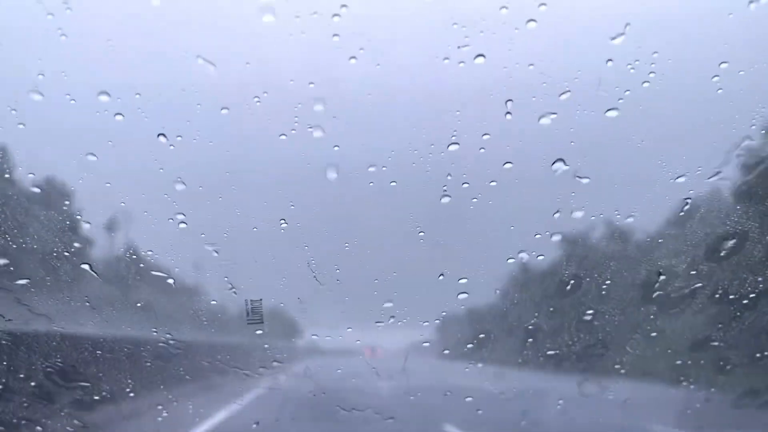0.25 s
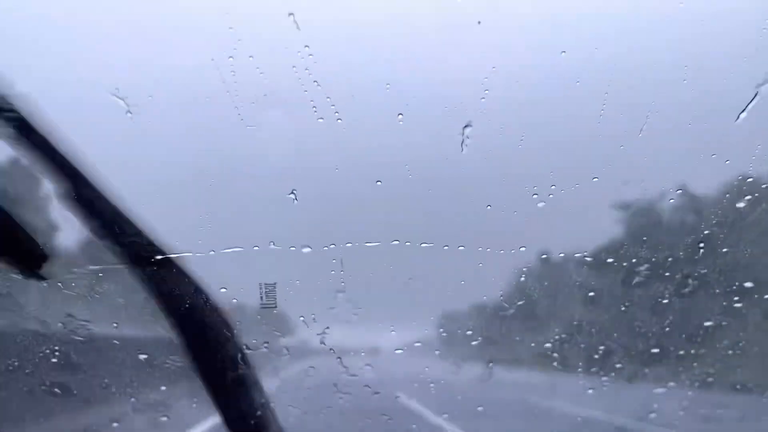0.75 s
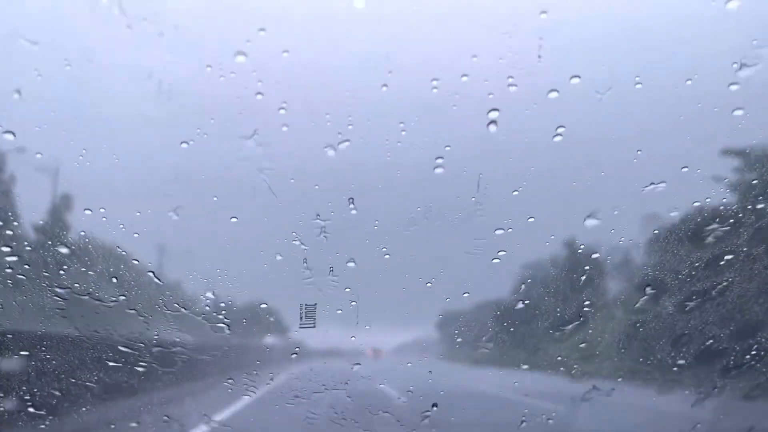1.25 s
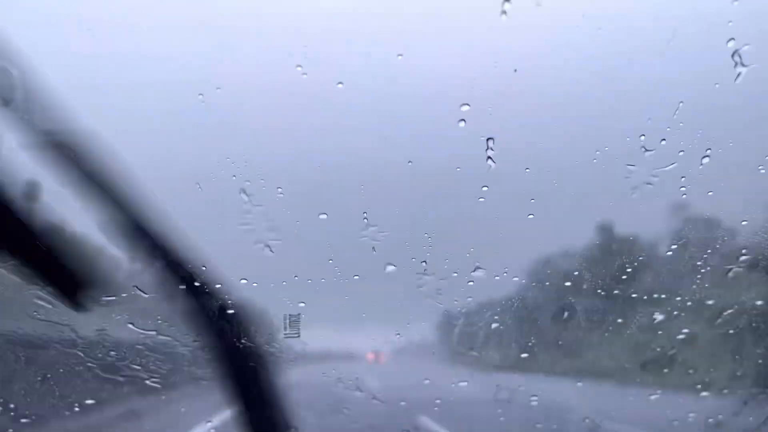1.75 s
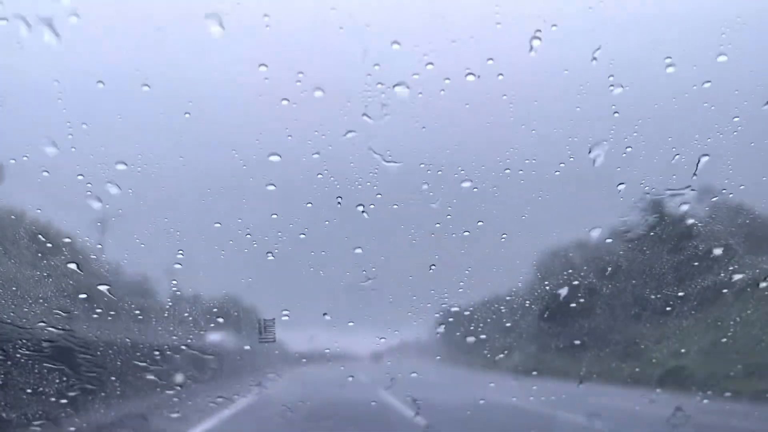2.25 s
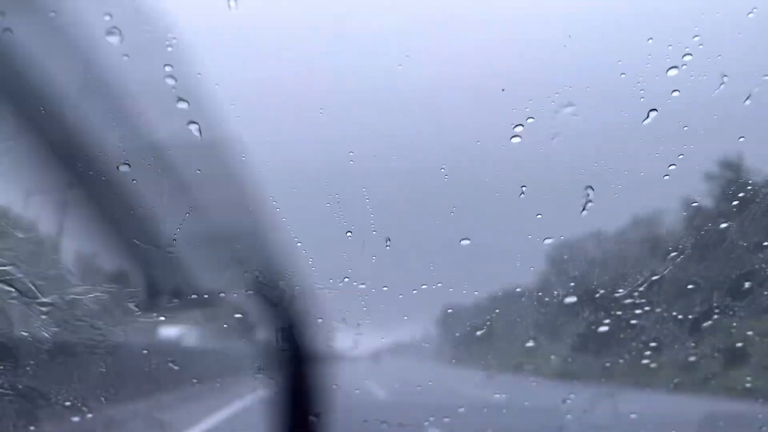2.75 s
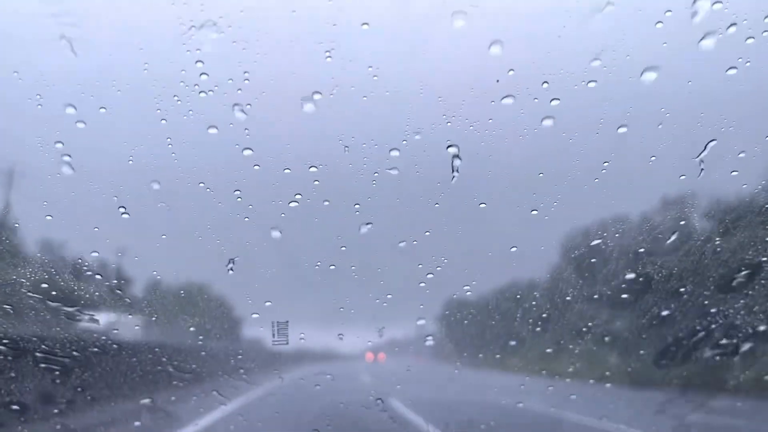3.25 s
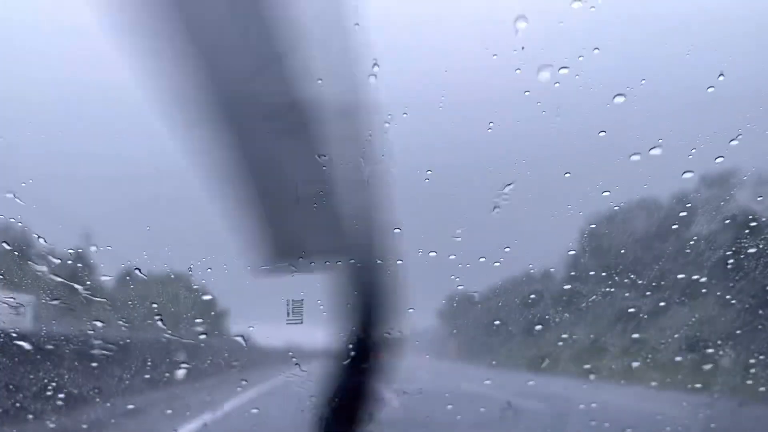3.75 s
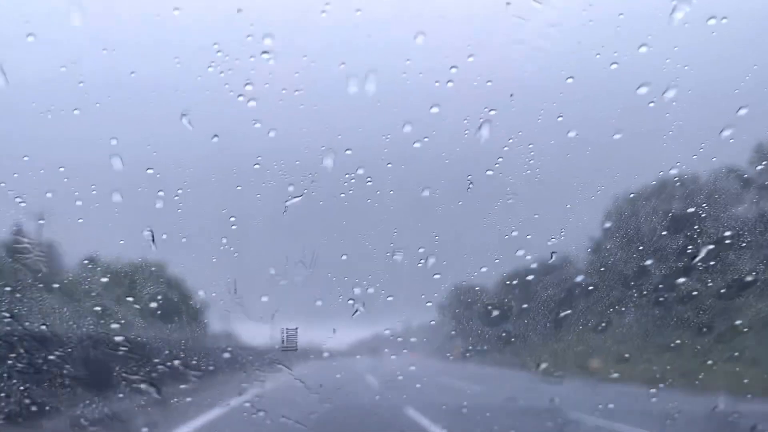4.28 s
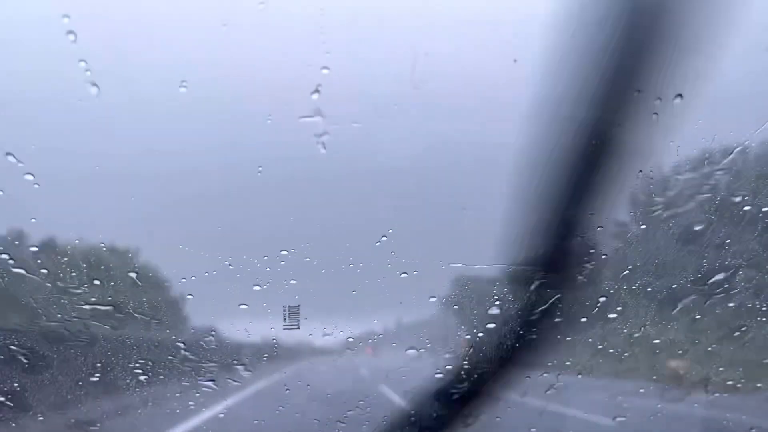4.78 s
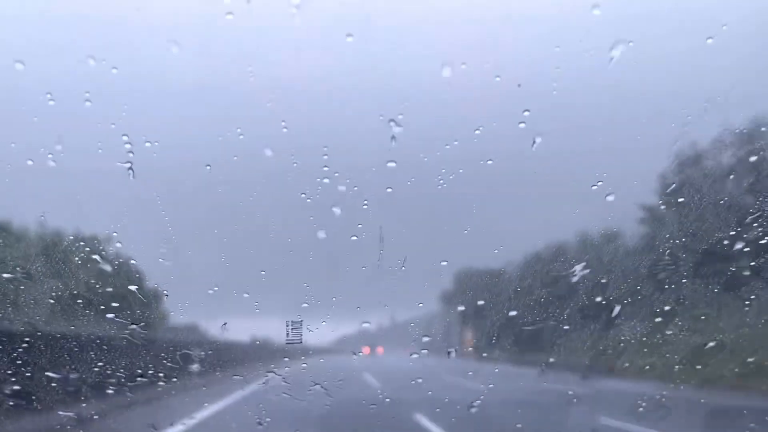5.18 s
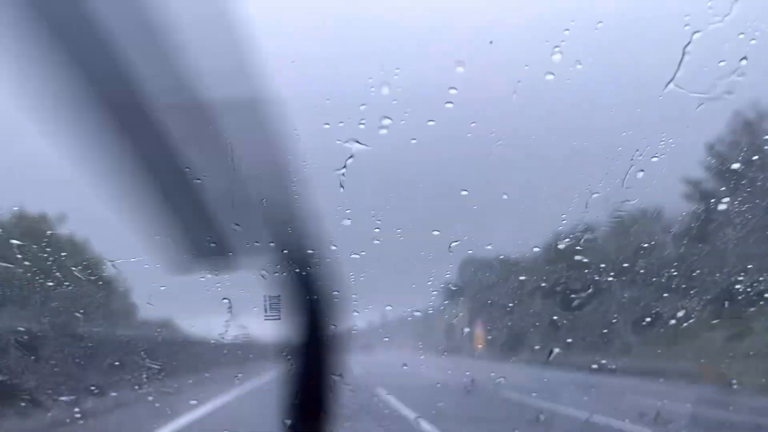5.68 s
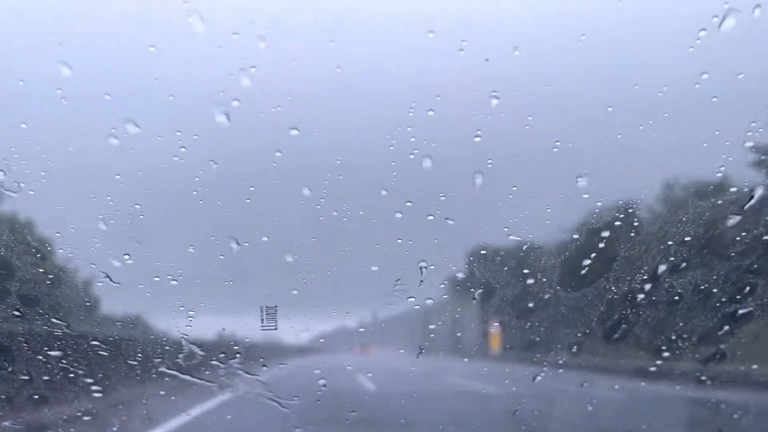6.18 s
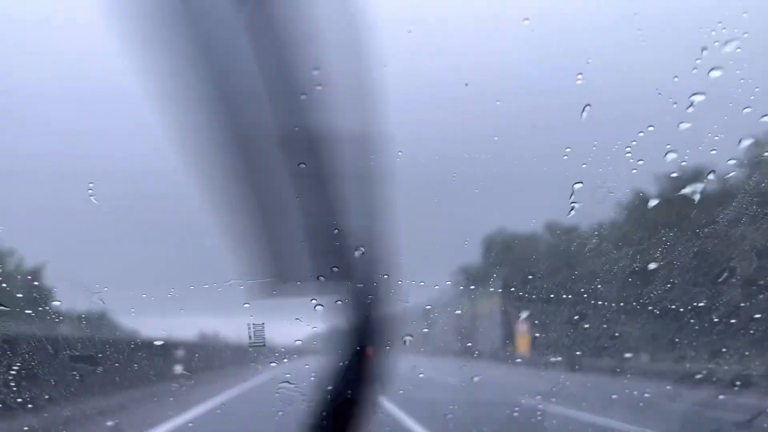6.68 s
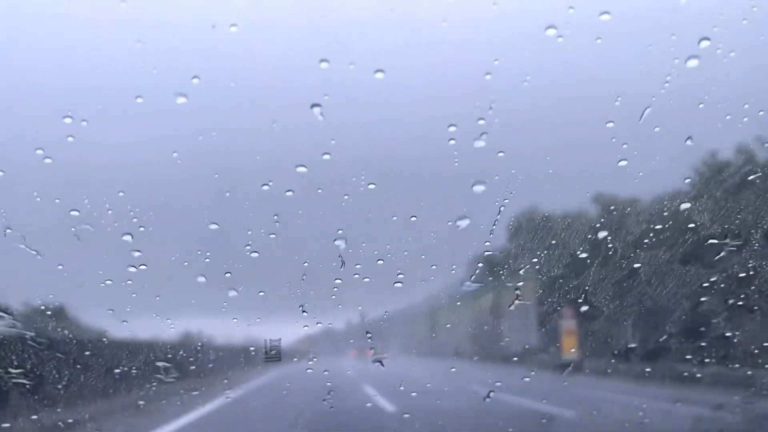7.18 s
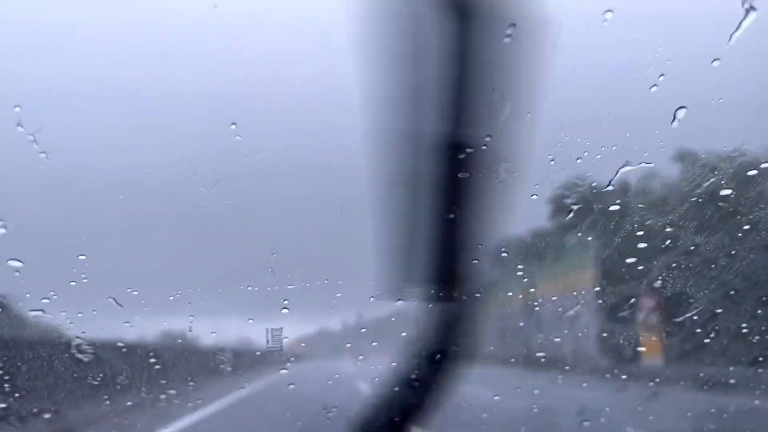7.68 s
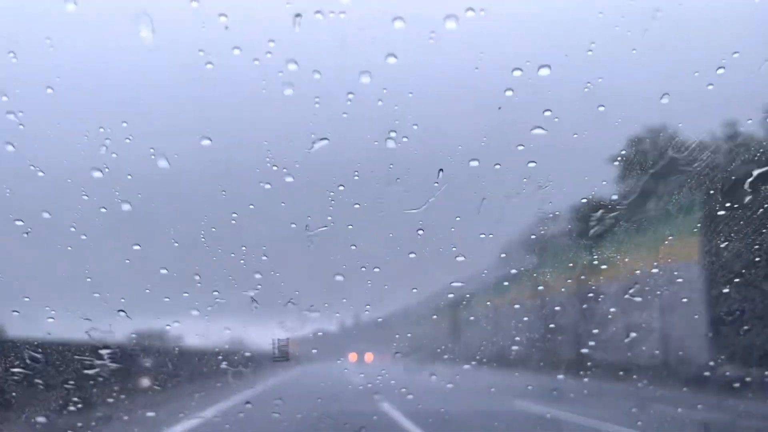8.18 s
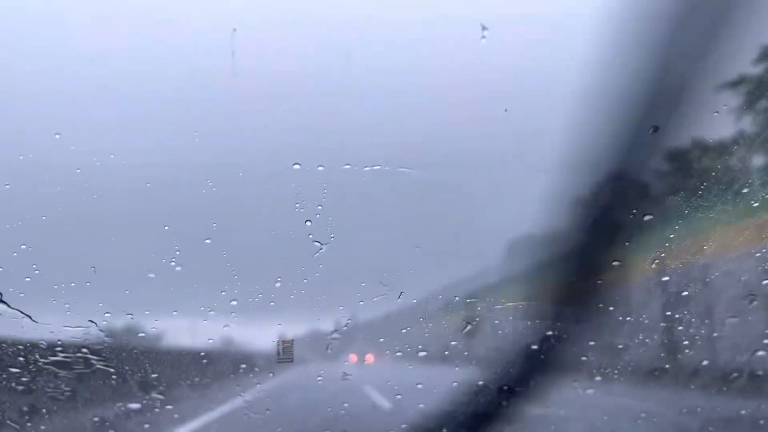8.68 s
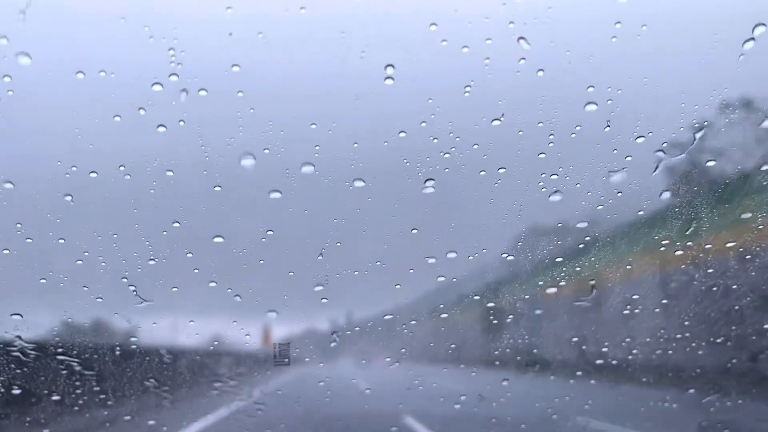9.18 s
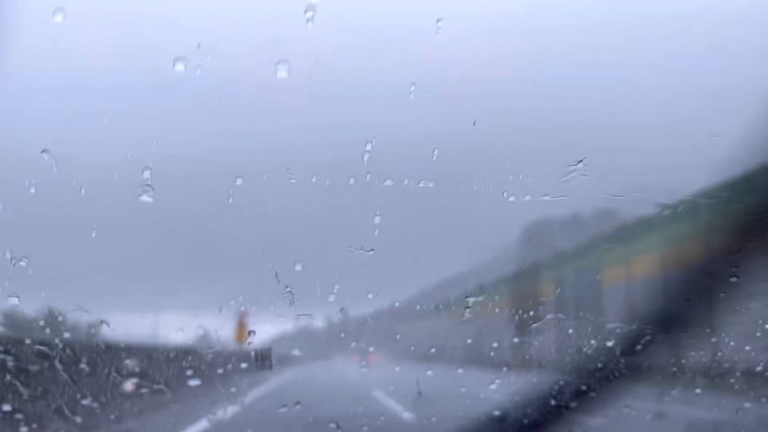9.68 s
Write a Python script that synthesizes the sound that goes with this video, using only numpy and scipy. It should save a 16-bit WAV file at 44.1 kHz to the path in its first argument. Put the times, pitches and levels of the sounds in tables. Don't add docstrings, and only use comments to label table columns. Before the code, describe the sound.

Inside a car in heavy rain, a crackling wash of drops surges and thins above a deep cabin boom, punctuated by regular soft wiper thuds.

```python
import sys
import numpy as np
from scipy import signal
from scipy.fft import rfft, irfft, dct, next_fast_len
from scipy.io import wavfile
from scipy.ndimage import uniform_filter1d

SR = 44100
rng = np.random.default_rng(int(sys.argv[2]) if len(sys.argv) > 2 else 0)


def to_wav(s):
    ch = np.atleast_2d(s).T
    pcm = np.round(np.clip(ch, -1, 1) * 32767)
    wavfile.write(sys.argv[1], SR, pcm.astype(np.int16))


def linear_from_db(decibels):
    return 10 ** (np.asarray(decibels, float) / 20)


N = 438354
SIZE = next_fast_len(N)
HZ = np.arange(SIZE // 2 + 1) * SR / SIZE + 1e-3
T = np.arange(N) / SR


def rain(glass_db, roof_db, spray_db):
    # time in seconds, peak in dB, treble against the peak in dB.
    fat_drops = [(0.6584, -17, -14), (0.945, -21, -15), (1.9046, -21, -9), (1.952, -29, -2),
                 (2.596, -22, -23), (2.6863, -16, -10), (3.0115, -25, -16), (3.5565, -22, 2),
                 (3.6003, -17, 1), (3.7843, -21, -15), (3.9544, -18, -10), (4.006, -15, -29),
                 (4.2133, -18, -5), (4.3755, -19, 6), (4.5516, -14.5, -5), (5.3836, -12.5, -5),
                 (5.7083, -9, -14), (6.2065, -22, -2), (6.236, -14, -2), (6.314, -18, -15),
                 (6.4938, -11, -8), (6.537, -13, -3), (6.5777, -11.5, -10), (6.785, -18.5, -1),
                 (6.992, -16.5, -11.5), (7.2185, -16, -3), (7.4566, -17, -11), (7.659, -17, -3),
                 (8.7261, -22, -4), (9.8014, -19, -17)]
    # time in seconds, peak in dB.
    ticks = [(1.9869, -23), (3.5169, -16.5), (4.3216, -50), (4.345, -22), (4.4697, -16), (4.647, -17.5),
             (4.6942, -19), (5.1174, -17), (5.1866, -16.5), (5.7089, -28), (6.0452, -15), (6.0721, -17),
             (6.205, -24), (6.5814, -22), (6.7322, -21), (6.783, -21), (6.8383, -22), (6.886, -24),
             (7.013, -28), (7.1023, -24), (7.427, -21), (8.1778, -32), (8.7261, -25)]
    # frequency in Hz, density in dB per Hz.
    glass_tone = [(90, -5.5), (200, 5.5), (400, 5), (650, 1), (950, -1), (1300, -3), (1900, -4),
                  (2800, 0.5), (4000, -1), (5500, -6), (8300, -11), (11000, -13.5), (14000, -15),
                  (16000, -19.5)]
    drops_per_s = 900
    at = rng.uniform(0, N / SR, drops_per_s * N // SR)
    size_db = np.minimum(2.9 * rng.exponential(size=len(at)), 13.5)
    fat_s, fat_db, bright_db = np.transpose(fat_drops)
    tick_s, tick_db = np.transpose(ticks)

    centres = 354 * 2 ** np.arange(0, 5.6, .5)
    sheet, out = walk(22), 0
    for hz in centres:
        high = np.clip(np.log2(hz / 3500) / 2.0, 0, 1)
        low = np.clip(np.log2(2000 / hz) / 1.17, 0, 1)
        decay_s = 0.0012 + 1.0 / hz
        favour_db = 2.9 * rng.standard_normal(len(at))
        drops = tails(at, linear_from_db(2 * (size_db + favour_db)), decay_s)
        mist = np.clip(0.43 + 0.027 * (glass_db + 29.0), 0, 1)
        power = mist + (1 - mist) * drops / drops.mean()
        db = glass_db + low * roof_db + high * spray_db
        db = db + (.7 - .5 * low) * sheet + 0.78 * walk(12)

        fat_band_db = fat_db - 6.0 + high * (bright_db + 4.5) - 7.8 * low
        tick_band_db = tick_db + 5.5 - 9 * (1.5 - high) - 6.2 * low
        single = tails(fat_s, linear_from_db(2 * fat_band_db), 1.77 * decay_s)
        single += tails(tick_s, linear_from_db(2 * tick_band_db), 1.3 * decay_s)

        octaves = np.log2(np.maximum(HZ, 354) / hz)
        band = np.clip(1 - np.abs(2 * octaves), 0, 1) ** .5
        hiss = rng.standard_normal((2, N)) * np.sqrt(power * linear_from_db(2 * db) + single)
        out = out + band * rfft(hiss, SIZE)
    out = out + rfft(pings(glass_db - 10.0, ring_s=.0035), SIZE)
    return out * colour(glass_tone, 1490, 5370) * linear_from_db(1.5)


def tails(at, power, decay_s):
    hits = np.bincount((at * SR).astype(int), power, N)[:N]
    fast, slow = np.exp(-4 / (decay_s * SR)), np.exp(-1 / (decay_s * SR))
    decaying = signal.lfilter([1.], [1, -slow], hits)
    return signal.lfilter([1 - fast], [1, -fast], decaying)


def pings(level_db, ring_s):
    at, pitch, size = rng.random((3, 2, 4000, 1))
    n = np.arange(512)
    start = (at * (N - len(n))).astype(int)
    hz = 700 * 20 ** pitch ** .7
    tone = np.sin(2 * np.pi * hz * n / SR)
    rings = linear_from_db(level_db[start] + 7 * size) * tone * np.exp(-n / (ring_s * SR))
    return np.array([np.bincount((i + n).ravel(), ring.ravel(), N) for i, ring in zip(start, rings)])


def wipers():
    # time in seconds, peak in dB, pitch in Hz, knock against the peak in dB.
    flips = [
        (0.824, -17, 147, -5),
        (1.792, -14.5, 162, -9),
        (2.764, -16.5, 214, -10),
        (3.739, -17, 230, -8),
        (4.719, -12, 146, -8),
        (5.693, -11.5, 144, -8),
        (6.662, -14.5, 170, -6),
        (7.644, -14.5, 160, -3),
        (8.61, -11.5, 151, -6.5),
        (9.583, -12, 156, -1.5),
    ]
    out, t = np.zeros(N), np.arange(SR // 8) / SR

    def shape(rise_s, decay_s):
        return (1 - np.exp(-t / rise_s)) * np.exp(-t / decay_s)

    for s, db, hz, knock_db in flips:
        cycles = hz * (t + 0.58 * 0.0058 * (1 - np.exp(-t / 0.0047)))
        thud = linear_from_db(6.5) * np.sin(2 * np.pi * cycles) * shape(0.0033, 0.015)
        knock = linear_from_db(knock_db + 10.5) * np.sin(2 * np.pi * 410 * t) * shape(0.0031, 0.0051)
        i = int((s - .003) * SR)
        out[i:i + len(t)] += linear_from_db(db) * (thud + knock)[:N - i]
    return np.array([out * linear_from_db(-3.5), np.roll(out, -8) * linear_from_db(-1.8)])


def road(boom_db):
    # frequency in Hz, density in dB per Hz.
    road_tone = [(12, -20), (20, -8), (48, 2.5), (97, 3.5), (125, 1.5), (188, -13), (260, -14), (340, -27),
                 (570, -120)]
    rumble = rng.standard_normal((2, N)) * linear_from_db(boom_db)
    return rfft(rumble, SIZE) * colour(road_tone, 30, 156) * linear_from_db(-0.73)


def colour(points, lo_hz, hi_hz):
    hz, db = np.transpose(points)
    gain = linear_from_db(np.interp(np.log(HZ), np.log(hz), db))
    inside = (HZ > lo_hz) & (HZ < hi_hz)
    return gain / np.sqrt(np.sum(gain[inside] ** 2) / len(HZ))


def modes(table):
    return linear_from_db(sum(db / (1 + (2 * (HZ - hz) / width) ** 2) for hz, width, db in table))


def walk(rate):
    k = int(SR / rate)
    held = np.repeat(rng.standard_normal(400), k)[:N]
    return 1.3 * uniform_filter1d(uniform_filter1d(held, k), k)


def swells(events):
    t = T[::64]
    total_db = sum(db * np.exp(-.5 * ((t - s) / half_s) ** 2) for s, db, half_s in events)
    return np.interp(T, t, total_db)


def scene():
    # time in seconds, rain on the glass in dB.
    rainfall = [
        (0, -32),
        (1.5, -26),
        (2.8, -29.5),
        (4, -29),
        (5.6, -27),
        (6.5, -30),
        (7, -33.5),
        (7.9, -34.5),
        (9, -31.5),
        (9.94, -30.5),
    ]
    # middle in seconds, swell in dB, half length in seconds.
    gusts = [(0, 4.5, 0.056), (.38, 3.5, 0.14), (.81, 3.5, 0.02), (1.07, -3, .08), (1.26, 3.5, 0.021),
             (1.59, -3, 0.094), (1.92, -1.9, 0.019), (2.03, 4.2, 0.015), (2.52, -1.4, 0.055),
             (2.94, -4.5, 0.027), (3.32, 3, 0.067), (3.61, 1.5, 0.026), (3.71, -3.5, .035),
             (3.83, 1.5, 0.053), (4.25, -4, 0.051), (4.38, 2, 0.018), (4.67, -4, 0.038), (4.77, 3.5, 0.036),
             (5.17, -2.3, .025), (5.57, 2.3, 0.017), (6.36, 2.5, .04), (6.56, 1, 0.031), (6.73, -4.5, 0.02),
             (7.17, 4, 0.038), (7.29, -1, 0.018), (7.39, 4.5, 0.4), (7.88, 0, 0.049), (8.58, 1.5, 0.18),
             (9.6, 2.4, 0.078)]
    # middle in seconds, swell in dB, half length in seconds.
    drumming = [(.02, 3, .04), (.2, 2.5, 0.067), (.48, 0.5, .025), (1.14, -1.5, .2), (1.43, 3, .03),
                (1.65, -2, 0.06), (2.24, -4, 0.025), (3.38, -2.2, 0.13), (4.05, 2, 0.056), (5.13, -1, 0.13),
                (5.51, -4, 0.034), (6.13, 2, .04), (6.56, 3.5, 0.081), (6.75, -2.1, 0.022),
                (9.08, -1.6, 0.055), (9.18, 4, 0.023), (9.3, 1.5, .025)]
    # middle in seconds, swell in dB, half length in seconds.
    boom_swells = [(.06, 1, 0.027), (.3, 2.1, 0.055), (.53, 7, 0.019), (.68, 6, 0.12), (1.15, -3, 0.046),
                   (1.5, -0.5, 0.18), (1.85, -1, .025), (2.17, 5, 0.012), (2.43, 2, 0.063), (2.85, 2.4, .035),
                   (3.31, 3.3, .09), (3.85, 3, 0.091), (4.2, 1.5, 0.056), (4.57, 2, .025), (4.95, 0, .025),
                   (5.1, 2.5, 0.033), (5.82, -2.3, 0.064), (6.05, 2, .04), (6.88, 2.5, 0.02), (7.16, 3.5, 0.033),
                   (8.12, 3.5, 0.035), (8.27, 0, 0.046), (8.55, 2.5, .025), (8.64, 3.5, 0.07), (8.86, 3.5, .03),
                   (9.8, 1.5, 0.034)]
    # frequency in Hz, width in Hz, gain in dB.
    cabin = [(85, 20, 2), (128.7, 17, 2.5), (594, 30, 6.5), (935, 39, 6.5)]
    # frequency in Hz, width in Hz, gain in dB.
    dash = [(683, 35, 9), (1100, 18, 0.5), (1160, 17, 6)]
    # frequency in Hz, right lag in radians, likeness from 0 to 1, left minus right in dB.
    ports = [(50, 0, 1, 0), (120, -.04, 1, 0), (260, -.18, .985, -1), (430, -.43, .92, -2.5),
             (650, -.75, .55, -5), (800, -.3, .4, -3), (1200, 0, .7, 0), (1700, 0, .85, -.7),
             (2700, 2.1, .65, .8), (3100, 2, .72, -1.8), (4300, 1, .6, -1), (4800, 1.5, .42, -2),
             (5450, 2.7, .6, -1.5), (6000, 3.14, .8, 0), (6600, 3.9, .75, 0), (7900, 5.45, .78, 0),
             (9000, 6.28, .87, 0), (10000, 6.85, .8, 0), (11350, 8.6, .8, 0), (12400, 9.42, .85, 0),
             (13400, 9.95, .78, 0), (14150, 11.2, .55, 0), (14800, 12.4, .85, 0), (16000, 12.7, .85, 0)]
    roof_feels, spray_feels = 0.75, 1.16
    gust_db = swells(gusts)
    glass_db = np.interp(T, *np.transpose(rainfall)) + gust_db
    roof_db = (roof_feels - 1) * gust_db + swells(drumming) + 0.13 * walk(9)
    spray_db = (spray_feels - 1) * gust_db + 0.27 * walk(9)
    boom_db = -25 + swells(boom_swells) - 0.1 * walk(6)
    shared, own = rain(glass_db, roof_db, spray_db) + road(boom_db)
    shared, own = shared * modes(cabin), own * modes(dash)

    hz, *columns = np.transpose(ports)
    lag, alike, tilt_db = (np.interp(HZ, hz, c) for c in columns)
    alike = np.clip(alike, 0, 1)
    right = alike * np.exp(-1j * lag) * shared + np.sqrt(1 - alike ** 2) * own
    both = np.array([shared * linear_from_db(tilt_db / 2), right * linear_from_db(-tilt_db / 2)])
    return irfft(both, SIZE)[:, :N] + wipers()


def one_signal(dry, alike):
    sharp_s = [
        3.49,
        4.65,
        5.71,
        6.65,
        6.78,
        6.89,
        7.66,
        8.73,
    ]
    edges = np.r_[0:40:4, 40:96:8, 96:144:12, 144:192:16, 196, 216, 240, 264, 292, 320:769:32]
    coarse = [(4, .07), (16, .1), (60, .35), (130, .45), (200, .7), (260, .9), (400, 1.05)]
    hop, grid = 1024, 753
    mid_side = np.array([dry[0] + dry[1], dry[0] - dry[1]]) / 2
    mid_side = np.pad(mid_side, ((0, 0), (2 * hop - grid, 2 * hop)))
    count, h = mid_side.shape[1] // hop - 1, hop // 2
    window = signal.windows.kaiser_bessel_derived(2 * hop, 4 * np.pi)
    at = hop * np.arange(count)[:, None] + np.arange(2 * hop)
    a, b, c, d = np.split(mid_side[:, at] * window, 4, axis=2)
    folded = np.dstack([-c[..., ::-1] - d, a - b[..., ::-1]])
    lines = dct(folded, type=4, norm="ortho")
    calm = np.ones(count, bool)
    calm[((np.array(sharp_s) * SR - grid) / hop + 1.5).astype(int)] = False

    for lo, hi in zip(edges[:-1], edges[1:]):
        mid, side = np.sum(lines[..., lo:hi] ** 2, axis=2) + 1e-12
        lean = uniform_filter1d((mid - side) / (mid + side), size=2)
        merged = calm & (lo >= 264) & (np.abs(lean) > alike)
        restore = np.sqrt((mid + side) / np.where(lean > 0, mid, side))
        keep = restore * np.array([lean > 0, lean <= 0])
        lines[..., lo:hi] *= np.where(merged, keep, 1)[..., None]
        step = np.interp(lo, *np.transpose(coarse)) * np.sqrt((mid + side) / (hi - lo))[:, None]
        steps = np.floor(np.abs(lines[..., lo:hi] / step) ** .75 + .4) ** (4 / 3)
        lines[..., lo:hi] = step * steps * np.sign(lines[..., lo:hi])

    u = dct(lines, type=4, norm="ortho")
    frames = np.dstack([u[..., h:], -u[..., :h - 1:-1], -u[..., h - 1::-1], -u[..., :h]]) * window
    joined = (frames[:, 1:, :hop] + frames[:, :-1, hop:]).reshape(2, -1)
    mid, side = joined[:, hop - grid:hop - grid + N]
    return np.array([mid + side, mid - side])


def roll_off(x):
    return signal.sosfilt(signal.butter(12, 15840, fs=SR, output="sos"), x)


def record(dry):
    rounded = np.tanh(1.1 * dry) / 1.1
    merged = one_signal(rounded, alike=.56)
    return roll_off(merged)


dry = scene()
out = record(dry)
to_wav(out)
```